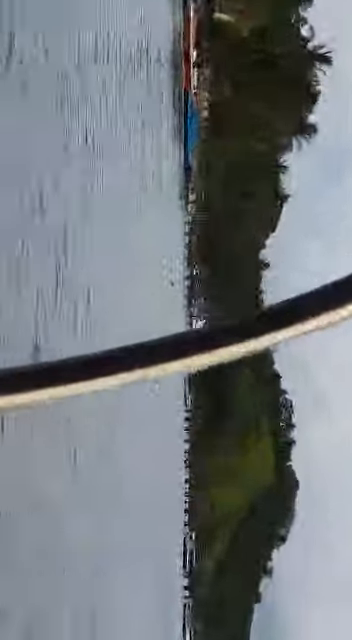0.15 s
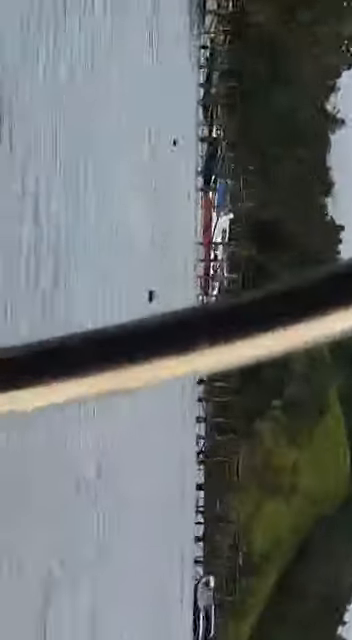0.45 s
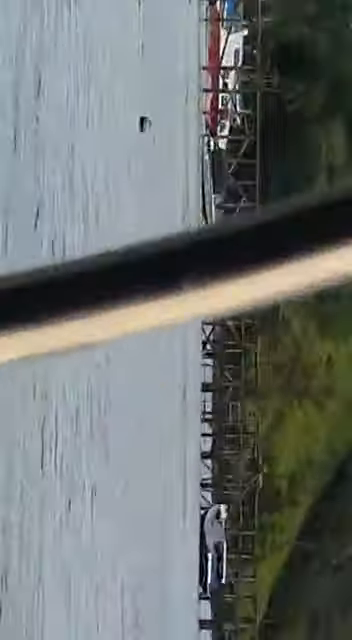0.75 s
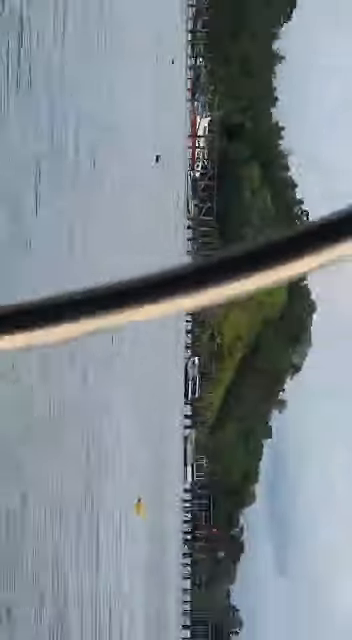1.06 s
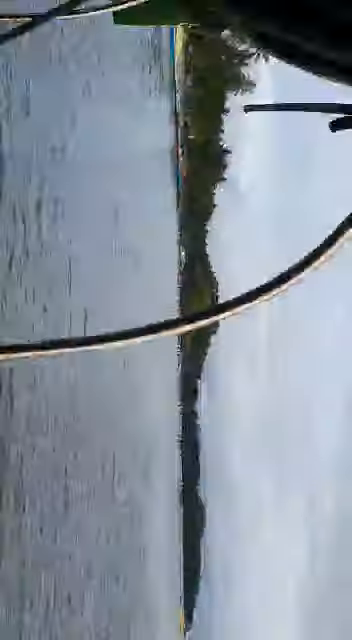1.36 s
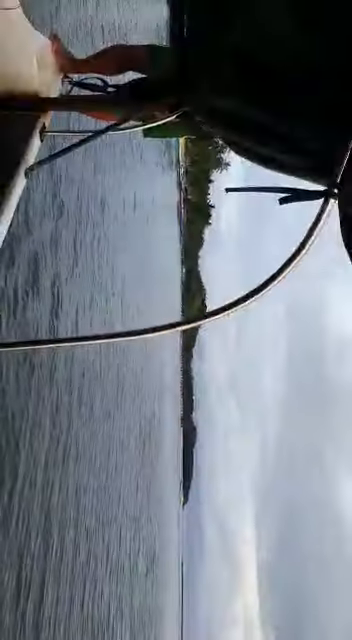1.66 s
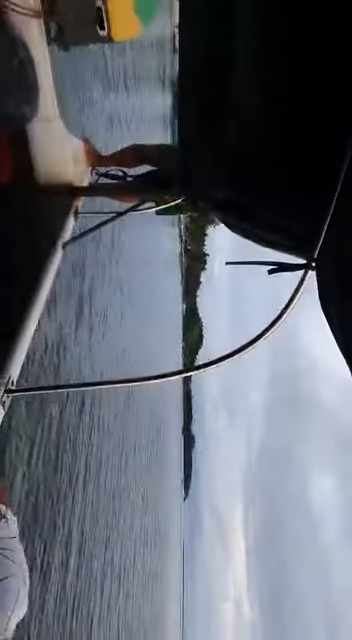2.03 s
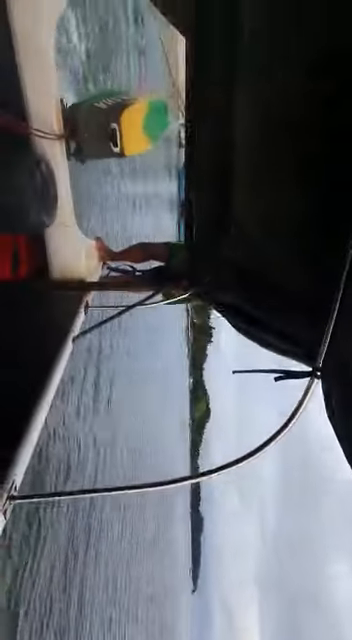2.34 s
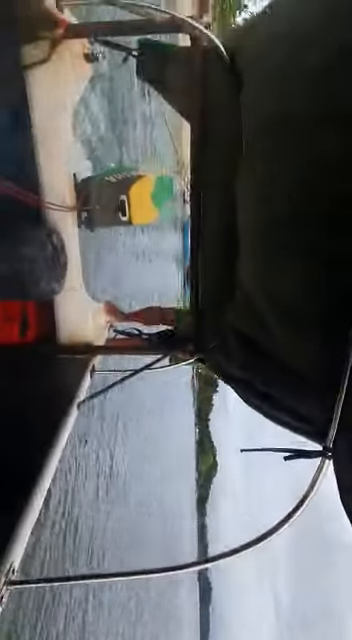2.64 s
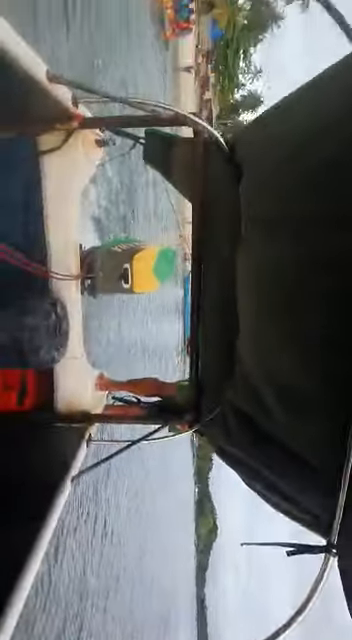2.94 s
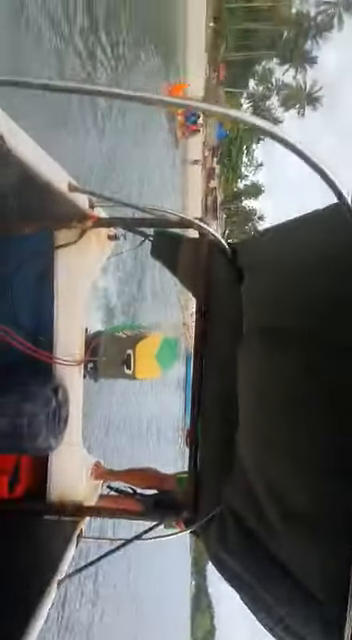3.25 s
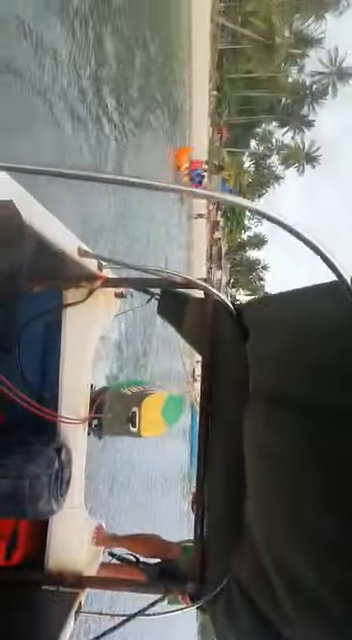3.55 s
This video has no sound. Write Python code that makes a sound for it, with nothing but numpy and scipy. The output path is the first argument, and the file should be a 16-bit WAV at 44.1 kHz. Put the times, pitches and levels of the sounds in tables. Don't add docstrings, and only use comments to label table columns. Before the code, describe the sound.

An outboard motor idles throughout, about 3.7 seconds, its deep hull hum and wet exhaust burble turning over some thirty times a second. Uneven hard firings, several each second, knock, ring the metal cowl and spit hiss. Hollow gulps, light rattles, wake wash and faint drops surround it. The motor sits left until about 2 s, then swings to centre by 3.5 s as the onboard stereo microphone turns.

```python
import sys
import numpy as np
from scipy import signal
from scipy.io import wavfile
from scipy.ndimage import uniform_filter1d

SR = 44100
rng = np.random.default_rng(int(sys.argv[2]) if len(sys.argv) > 2 else 0)


def makeup_ratio(level_db):
    decades = np.asarray(level_db, float) / 20
    return 10 ** decades


def bounce(signal):
    frames = np.transpose(np.atleast_2d(signal))
    limited = np.clip(frames, -1, 1)
    pcm = np.round(limited * 32767).astype(np.int16)
    wavfile.write(sys.argv[1], SR, pcm)


N = 162729

# t/s, f/Hz, level/dB
HULL = [(0.0, 33.07, -16), (0.11, 32.91, -25.5), (1.26, 33.26, -30.5), (1.64, 32.81, -26),
        (2.06, 33.97, -28.5), (2.52, 31.58, -27), (2.83, 31.61, -29), (2.88, 31.4, -35), (3.06, 31.87, -27),
        (3.35, 31.19, -26.5), (3.46, 32.9, -21.5), (3.53, 33.4, -33), (3.69, 32.7, -21)]
# peak t/s, panel ring level/dB, length/s, block thud level/dB
FIRINGS = [(0.073, -38, 0.01, -40.5), (0.165, -28, 0.0078, -32), (0.32, -28.5, 0.0045, -22),
           (0.336, -39, 0.008, -31), (0.41, -33, 0.015, -25), (0.568, -30, 0.0062, -47),
           (0.744, -34.5, 0.018, -28), (0.935, -30.5, 0.0079, -20.5), (1.025, -25.5, 0.0073, -47),
           (1.107, -27, 0.0083, -42), (1.295, -33, 0.007, -22.5), (1.485, -30.9, 0.013, -29),
           (1.58, -35, 0.0049, -39), (1.658, -33.5, 0.015, -38), (1.832, -33, 0.0077, -44),
           (1.855, -29.5, 0.011, -34), (2.067, -32.5, 0.007, -22), (2.229, -39, 0.0044, -50),
           (2.253, -29.5, 0.0073, -34), (2.439, -37, 0.016, -24), (2.464, -41, 0.0036, -30),
           (2.631, -35.5, 0.012, -21), (2.729, -34.5, 0.0088, -19), (2.808, -31.5, 0.0065, -45),
           (2.987, -34.5, 0.0047, -33), (3.021, -35.5, 0.0075, -22), (3.039, -45, 0.011, -40),
           (3.334, -37.5, 0.01, -56), (3.425, -33.5, 0.011, -28), (3.582, -39.5, 0.015, -26),
           (3.671, -41, 0.022, -26.5)]
# f/Hz, width/Hz, level/dB
COWL = [(361.4, 40, -5.5), (526.3, 72, -3), (759, 39, -3), (1200.5, 52, -7), (1550, 18, -11),
        (1838, 85, -11), (2346, 31, -14), (1033, 170, -18), (3230, 47, -16.5)]
PANEL_HZ = 1202.3


def rms_one(x):
    return x / np.sqrt(np.mean(x ** 2) + 1e-20)


def in_time(rows):
    s, *columns = np.transpose(rows)
    return [np.interp(np.arange(N) / SR, s, c) for c in columns]


def at_hz(points, hz):
    hz_points, values = np.transpose(points)
    return np.interp(np.log(hz), np.log(hz_points), values)


def drift(rate):
    r = np.exp(-80 * np.pi * rate / SR)
    white = rng.standard_normal(N // 40 + 2002)
    slow = signal.lfilter([1], [1, -2 * r, r * r], white)[2000:]
    return np.interp(np.arange(N) / 40, np.arange(len(slow)), rms_one(slow))


def resonate(x, body):
    out = 0
    for k, (hz, width_hz, db) in enumerate(body):
        r = np.exp(-np.pi * width_hz / SR)
        poles = [1, -2 * r * np.cos(2 * np.pi * hz / SR), r * r]
        out = out + (-1) ** k * makeup_ratio(db) * signal.lfilter([1 - r * r, 0, r * r - 1], poles, x)
    return rms_one(out)


def bursts(s, db, length_s):
    rise, fall, least_s = 0.4, 0.85, 0.0069
    out, t = np.zeros(N + SR), np.arange(-SR // 20, SR // 10) / SR
    for at, level, length in np.broadcast(s, db, length_s):
        i = int(at * SR) + SR // 2 - SR // 20
        width_s = np.where(t < 0, rise, fall) * (length + least_s)
        out[i:i + len(t)] += makeup_ratio(level) * np.exp(-np.abs(t / width_s) ** 1.5)
    return out[SR // 2:SR // 2 + N]


def wavelets(rows, length_s):
    out, t = np.zeros(N + SR), np.arange(-SR // 10, SR // 10) / SR
    for (at, db, hz), length, phase in zip(rows, length_s, rng.random(len(rows))):
        i = int(at * SR) + SR // 2 - SR // 10
        bell = np.exp(-0.5 * (t / length) ** 2)
        out[i:i + len(t)] += np.sqrt(2) * makeup_ratio(db) * bell * np.sin(2 * np.pi * (hz * t + phase))
    return out[SR // 2:SR // 2 + N]


def wander_tone(hz, spread_hz, rate):
    return np.sqrt(2) * np.sin(2 * np.pi * np.cumsum(hz + spread_hz * drift(rate)) / SR)


def banded(spectrum):
    # f/Hz, coherence (0-1)
    likeness = [(250, 0.94), (600, 0.17), (1400, 0.06)]
    patchy_db = 0.8
    out, together, edges = 0, drift(3), 220 * 2 ** np.arange(0, 6.4, 1 / 3)
    white = rng.standard_normal((2, 2, N))
    for k, (low, high) in enumerate(zip(edges, edges[1:])):
        band = signal.butter(2, [low, high], "band", fs=SR, output="sos")
        mid, side = signal.sosfilt(band, white[k % 2])
        centre = np.sqrt(low * high)
        alike = np.clip(at_hz(likeness, centre), 0, 1)
        gain = makeup_ratio(at_hz(spectrum, centre) + patchy_db * (0.49 * together + drift(6)))
        out = out + gain * (np.sqrt(1 + alike) * mid + np.sqrt(1 - alike) * side * [[1], [-1]])
    return rms_one(out)


def split_treble(x):
    return [signal.sosfilt(signal.butter(4, 7000, kind, fs=SR, output="sos"), x) for kind in ("low", "high")]


def pan(x, db):
    return x * makeup_ratio(np.array([db / 2, -db / 2]).reshape(2, -1))


def crank():
    jitter_s = 0.1435 / 32
    turns = np.cumsum(in_time(HULL)[0]) / SR
    s = np.flatnonzero(np.diff(np.floor(turns))) / SR
    return turns, s + jitter_s * rng.standard_normal(200)[:len(s)]


def hull_hum(turns):
    swell = 1 + 0.4 * drift(4)
    return np.sqrt(2) * makeup_ratio(in_time(HULL)[1]) * swell * np.sin(2 * np.pi * turns)


def exhaust_burble(turn_s):
    # t/s, level/dB
    effort = [(0.0, -20.5), (0.76, -24), (0.83, -23.5), (1.09, -25), (1.12, -21), (1.54, -22), (1.64, -20),
              (1.81, -22), (2.81, -22.5), (2.85, -30.5), (2.93, -21), (3.44, -23.5), (3.45, -27.5),
              (3.69, -19)]
    # f/Hz, width/Hz, level/dB
    leg = [(61.4, 24.7, -7), (77.26, 8.5, 3), (82.8, 11.7, 0.5), (107.5, 23.6, -4.5), (127.1, 15.7, -3),
           (167.2, 20, -10.5), (213, 20.5, -17.5), (249, 2.4, -32)]
    pulse_spread, turbulence, evening = 0.74, 0.87, 0.55
    burble_db, side_db = -0.5, -19
    pulses = np.zeros(N)
    i = np.clip((turn_s * SR).astype(int), 0, N - 1)
    pulses[i] = 1 + pulse_spread * rng.standard_normal(200)[:len(turn_s)]
    drive = rms_one(pulses) + turbulence * rng.standard_normal(N)
    soft = signal.butter(4, 330, fs=SR, output="sos")
    burble = signal.sosfilt(soft, resonate(drive, leg))
    level = np.sqrt(uniform_filter1d(burble ** 2, size=2400) + 0.00085)
    mid = makeup_ratio(burble_db) * rms_one(burble / level ** evening)
    side = makeup_ratio(side_db) * signal.sosfilt(soft, resonate(rng.standard_normal(N), leg))
    return makeup_ratio(in_time(effort)[0]) * (mid + side * [[1], [-1]])


def cowl_rattle(spit, facing_db):
    impacts_per_s, level_db, knock_db = 2500, -37, 29
    impacts = (rng.random(N) < impacts_per_s / SR) * rng.standard_normal(N) * makeup_ratio(1.2 * drift(25))
    return makeup_ratio(level_db + facing_db) * resonate(impacts * (1 + makeup_ratio(knock_db) * spit), COWL)


def wake_wash(loss_db):
    # f/Hz, level/dB per Hz
    wash_spectrum = [(300, 1), (600, -12), (1700, -12), (3300, -14.5), (5000, -23.5), (6300, -29.5),
                     (7200, -36.5), (9500, -30), (12000, -33), (16000, -36)]
    low, high = split_treble(makeup_ratio(-40) * banded(wash_spectrum))
    return makeup_ratio(0.55 * loss_db) * low, makeup_ratio(loss_db) * high


def fine_spray(high_hiss, loss_db):
    spatters = (rng.random(N) < 60 / SR) * rng.exponential(1, N)
    return makeup_ratio(-58.5 + loss_db) * np.convolve(spatters, np.hanning(80), "same") * high_hiss


def gas_throbs():
    # peak t/s, level/dB, f/Hz
    swells = [(0.011, -17.5, 97), (0.078, -13.5, 109.6), (0.169, -17.5, 80), (0.341, -22.5, 107),
              (0.476, -19, 70), (0.52, -22, 129.4), (0.586, -16, 85), (0.641, -21.5, 123), (0.811, -20, 76),
              (0.853, -21.5, 135), (0.918, -20, 84.5), (1.392, -22, 71), (1.489, -18, 77),
              (1.584, -15.5, 84), (1.655, -20, 78.4), (1.697, -17, 85), (1.746, -25.5, 75),
              (1.799, -22, 74), (1.994, -23, 130), (2.101, -18, 77), (2.233, -17, 77.88), (2.479, -22, 82),
              (2.515, -17.5, 76.5), (2.674, -25, 100), (2.739, -18.5, 77), (2.927, -17, 80.5),
              (2.969, -18, 118.5), (3.027, -17, 87), (3.211, -19, 84), (3.342, -18.5, 97),
              (3.581, -17.5, 82), (3.635, -31.5, 72), (3.678, -19, 80.6)]
    return makeup_ratio(-0.5) * wavelets(swells, np.full(len(swells), 0.013))


def gas_puffs(turn_s):
    # peak t/s, hiss level/dB, length/s, bright hiss level/dB
    puff_table = [(0.067, -38.5, 0.0047, -41.5), (0.322, -37.5, 0.0057, -42), (0.394, -41, 0.005, -67),
                  (0.56, -40, 0.006, -44), (0.595, -47, 0.0044, -44), (0.71, -43, 0.012, -50),
                  (0.74, -53, 0.0095, -52), (1.026, -53, 0.0035, -51), (1.059, -41, 0.015, -62),
                  (1.104, -44, 0.0066, -50), (1.32, -37, 0.01, -40.5), (1.477, -44.5, 0.007, -43.5),
                  (1.568, -37.5, 0.014, -39.5), (1.659, -44, 0.017, -53), (1.831, -34.5, 0.0055, -42),
                  (1.864, -45, 0.0052, -45.9), (2.059, -39.5, 0.02, -57), (0.937, -53, 0.0056, -50),
                  (2.22, -45, 0.006, -50), (1.287, -49, 0.0041, -50), (2.441, -43, 0.0052, -53),
                  (0.165, -59, 0.0085, -50), (2.47, -38.5, 0.01, -48), (2.723, -36.5, 0.0032, -44),
                  (2.807, -43, 0.0075, -82), (3.007, -37, 0.01, -50), (3.105, -52, 0.011, -55),
                  (1.388, -44, 0.025, -58), (3.335, -41, 0.0047, -49), (3.438, -48.5, 0.017, -76),
                  (3.57, -39.5, 0.023, -49), (3.666, -43, 0.044, -76)]
    trim_db = 2
    idle = bursts(turn_s, -43 + 1.5 * rng.standard_normal(200)[:len(turn_s)], 0.004)
    s, hiss_db, length_s, bright_db = np.transpose(puff_table)
    spit = bursts(s, hiss_db + trim_db, length_s)
    bright = bursts(s, bright_db + trim_db - 5, length_s)
    s, ring_db, length_s, _ = np.transpose(FIRINGS)
    spit = spit + bursts(s, ring_db - 15.5, 1.1 * length_s)
    bright = bright + bursts(s, ring_db - 24, 0.67 * length_s)
    return spit, bright, idle


def exhaust_hiss(spit, bright, idle, high_gain, low_hiss, high_hiss):
    crackle = rms_one(makeup_ratio(1.9 * drift(300)))
    dull = (spit * crackle + idle) * low_hiss
    sharp = high_gain * idle * high_hiss / 5 + bright * high_hiss * crackle
    return dull, sharp


def firing_rings():
    s, ring_db, length_s, thud_db = np.transpose(FIRINGS)
    flutter = makeup_ratio(2 * drift(62))
    ring = bursts(s, ring_db + 2.5, length_s) * wander_tone(PANEL_HZ, 10.9, 9.04) * flutter
    block = [(hz, 1.74 * width_hz, db) for hz, width_hz, db in COWL[:3]]
    thud = bursts(s, thud_db - 11, length_s) * resonate(rng.standard_normal(N), block)
    after = bursts(s + 0.026, ring_db - 16, 0.024) + makeup_ratio(-55 + 2.5 * drift(15))
    return ring + thud + after * resonate(rng.standard_normal(N), COWL[3:4])


def gulp_knocks():
    # peak t/s, level/dB
    gulp_table = [(0.096, -27), (0.147, -15.5), (0.41, -22.5), (0.482, -23.5), (0.582, -23.5),
                  (0.748, -23.5), (0.86, -26.5), (1.335, -47), (1.574, -17), (1.861, -24.5), (2.07, -23.5),
                  (2.209, -30), (2.489, -22.5), (2.731, -38), (3.04, -19.5), (3.577, -29), (1.11, -29)]
    gulp_hz, length_s = 214.8, 0.011
    s, db = np.transpose(gulp_table)
    tone = rms_one(wander_tone(gulp_hz, 10, 10) + wander_tone(0.8 * gulp_hz, 10, 10))
    return bursts(s, db - 3.5, length_s) * tone


def loose_parts():
    # peak t/s, level/dB, f/Hz
    part_table = [(.15, -29, 270), (.8, -25.5, 150), (.927, -40, 1210), (2.555, -27.5, 260),
                  (.735, -36, 380.3), (1.028, -32, 2810), (1.405, -31, 520), (2.538, -44, 1800),
                  (2.575, -44, 1800), (3.428, -41, 2630), (3.57, -45, 3652)]
    return wavelets(part_table, np.full(len(part_table), 0.0054))


def panel_pings():
    # t/s, peak level/dB
    ping_table = [(0.2557, -30), (0.5066, -36), (1.278, -35), (1.327, -31.5), (1.467, -35), (1.7339, -34),
                  (1.8207, -28), (1.891, -32), (2.0037, -34), (2.2078, -44), (2.338, -46), (2.4048, -39),
                  (2.5315, -46), (2.7795, -36), (2.9484, -41), (3.1037, -49), (3.1371, -37), (3.458, -36)]
    length_s = 0.0062
    s, db = np.transpose(ping_table)
    return bursts(s + 0.0062, db - 2.5, length_s) * wander_tone(PANEL_HZ, 26.7, 15)


def water_drops():
    # t/s, level/dB, f/Hz
    drop_table = [(0.3742, -48, 7840), (0.5996, -41, 4900), (1.0561, -47, 9000), (2.3964, -45, 5000),
                  (3.0466, -52.6, 10700), (3.1689, -46, 6160), (3.1694, -39, 2800), (3.2072, -59, 8960),
                  (3.2253, -44, 6160), (3.3671, -53, 5040), (3.5246, -45, 10700), (3.5501, -45.4, 5050)]
    cycles = 5
    return wavelets(drop_table, cycles / np.transpose(drop_table)[2])


def scene():
    # t/s, left lead/ms, treble left-right level/dB, treble loss level/dB, casing level/dB
    turning = [
        (0, 0.26, 12, 4.5, -1),
        (1.2, 0.21, 14.5, 0.5, -1.5),
        (2.0, 0.26, 12.5, 0.5, -1),
        (2.7, 0.099, 8, -0.5, 1),
        (3.2, 0.037, 4, 3, 1),
        (3.69, -0.13, 0, -4.5, -3.5),
    ]
    # f/Hz, level/dB per Hz
    hiss_spectrum = [(1300, -3.5), (2500, -3.5), (5000, -12.5), (7000, -26.5), (9500, -17.5), (16000, -26)]
    lead_ms, treble_db, loss_db, facing_db = in_time(turning)
    turns, turn_s = crank()
    spit, bright, idle = gas_puffs(turn_s)
    low_hiss, high_hiss = [rms_one(part) for part in split_treble(banded(hiss_spectrum))]

    bass = hull_hum(turns) + exhaust_burble(turn_s) + gas_throbs() + gulp_knocks()
    casing = cowl_rattle(spit + idle, facing_db) + firing_rings() + loose_parts() + panel_pings()
    n, shift = np.arange(N), lead_ms * SR / 2000
    casing = np.array([np.interp(n + shift, n, casing), np.interp(n - shift, n, casing)])

    dull_wash, sharp_wash = wake_wash(loss_db)
    dull_hiss, sharp_hiss = exhaust_hiss(spit, bright, idle, makeup_ratio(loss_db), low_hiss, high_hiss)
    dull = dull_wash + dull_hiss
    sharp = sharp_wash + sharp_hiss + fine_spray(high_hiss, loss_db) + water_drops()
    return pan(bass, 4) + pan(casing, 2.5) + pan(dull, 0.39 * treble_db) + pan(sharp, 0.78 * treble_db)


def band_limit(x):
    return signal.sosfilt(signal.butter(12, 15780, fs=SR, output="sos"), x)


def record(dry):
    low_cut = signal.butter(8, 23, "high", fs=SR, output="sos")
    top_cut = signal.cheby2(12, 70, 17500, fs=SR, output="sos")
    return band_limit(signal.sosfilt(np.vstack([low_cut, top_cut]), dry))


dry = scene()
out = record(dry)
bounce(out)
```